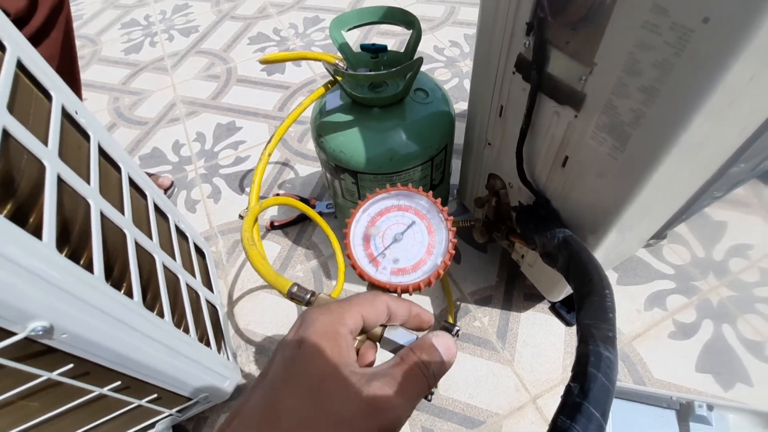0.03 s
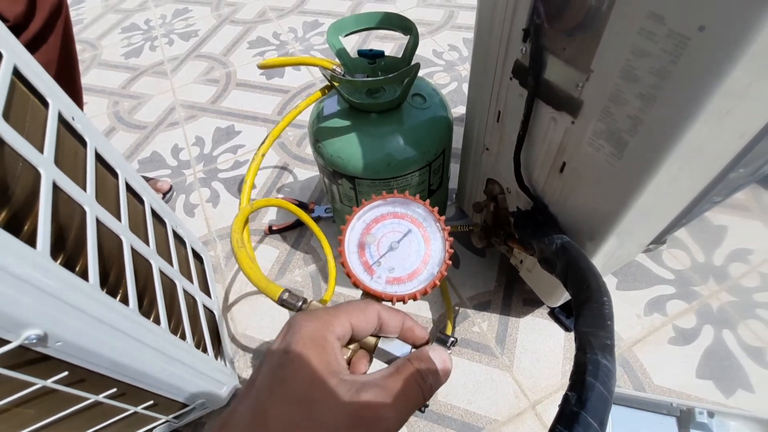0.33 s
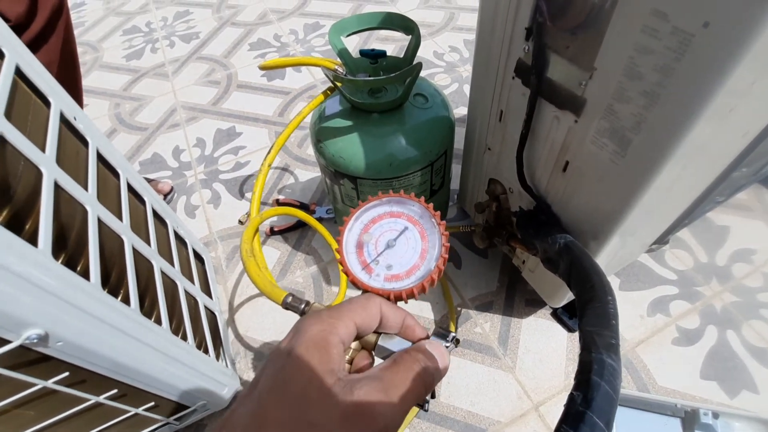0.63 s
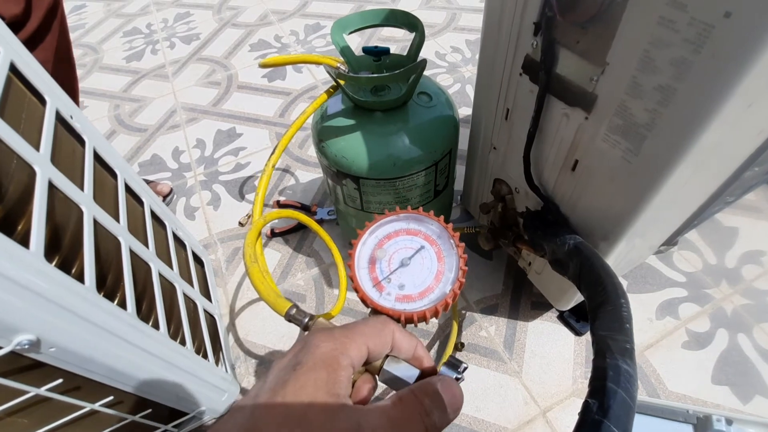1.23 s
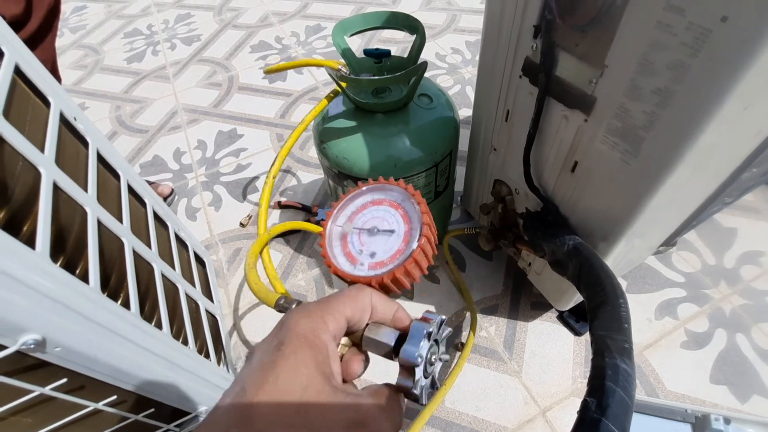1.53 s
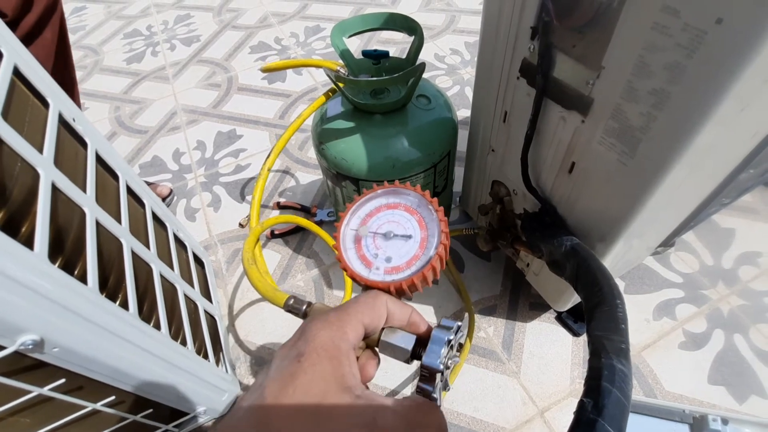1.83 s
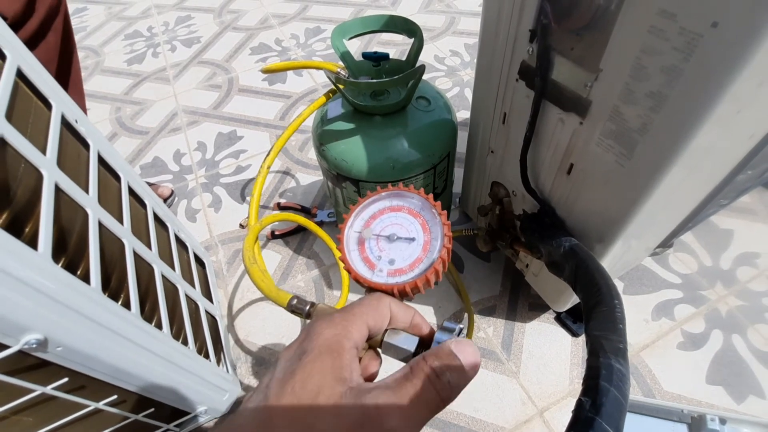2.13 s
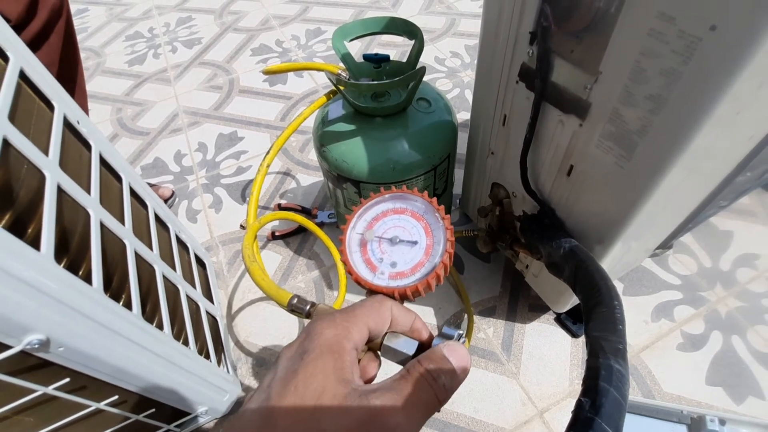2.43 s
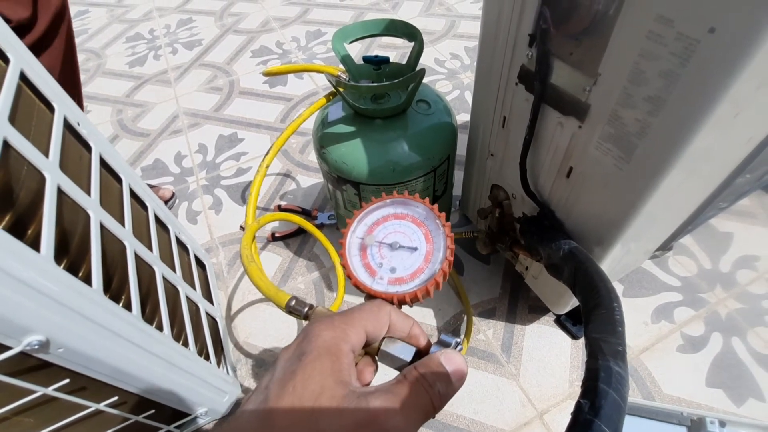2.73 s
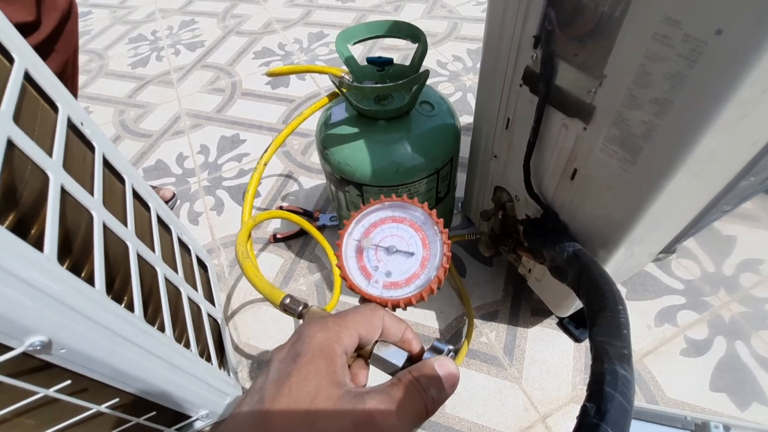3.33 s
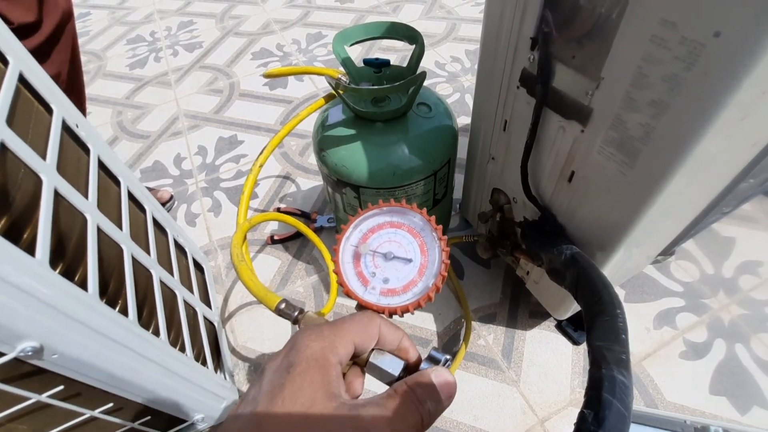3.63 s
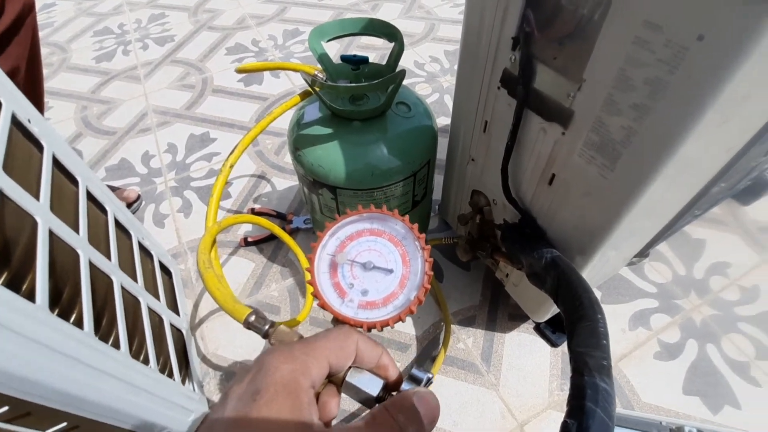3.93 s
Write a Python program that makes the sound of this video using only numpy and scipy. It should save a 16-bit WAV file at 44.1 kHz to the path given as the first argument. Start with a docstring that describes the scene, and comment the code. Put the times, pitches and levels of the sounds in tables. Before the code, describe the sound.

Gas escapes from a valve close by: a spit and thin whistle, then a loud hissing jet that rises in pitch and softens. Outdoors, an air conditioner fan drones and wind buffets the microphone throughout.

```python
"""Refrigerant gas escapes as a gauge valve is unscrewed from an outdoor air conditioner.
It spits, seeps with a thin whistle, then bursts out as a loud jet. The rushing gas makes the gap
ring, higher as the coupling turns, and the jet thins to a softer, higher hiss. All along, wind
buffets the left and right microphone openings (the ports) and the unit's fan drones.
A far bird chirps at the start."""
import sys
import numpy as np
from scipy import signal
from scipy.fft import rfft, irfft, next_fast_len
from scipy.io import wavfile
from scipy.ndimage import uniform_filter1d, map_coordinates

SR = 44100
rng = np.random.default_rng(int(sys.argv[2]) if len(sys.argv) > 2 else 0)


def wav_record(signal):
    """Record a signal, one row per channel, as 16-bit PCM in the file named by sys.argv[1]."""
    frames = np.transpose(np.atleast_2d(signal))
    bounded = np.clip(frames, -1, 1)
    # unit amplitude maps onto the largest positive 16-bit level
    quanta = np.round(bounded * 32767).astype(np.int16)
    wavfile.write(sys.argv[1], SR, quanta)


N = 176400

# how loud each steady or swelling sound is (time [s], level [dB])
FAN_LEVEL = [(0, -39.5), (1.7, -40), (1.95, -44.5), (2.6, -44.5), (3.55, -44.5), (3.69, -47.5),
             (3.8, -43.5), (4, -46)]
BREEZE_LEVEL = [(0, -43.5), (.45, -42.5), (.75, -34.5), (.92, -39), (1.05, -32.5), (1.2, -36.5),
                (1.35, -34.5), (1.5, -47), (1.75, -38.5), (1.97, -43.5), (2.03, -31.5), (2.15, -43.5),
                (2.35, -53.5), (2.63, -50), (2.78, -32), (2.96, -38.5), (3.15, -38), (3.35, -38.5),
                (3.55, -43), (3.68, -53), (3.85, -50), (4, -57)]
SEEP_LEVEL = [(1.39, -85), (1.42, -50), (1.47, -49.5), (1.6, -46), (1.75, -41), (1.78, -42), (1.8, -85)]
SPIT_LEVEL = [(1.395, -83), (1.408, -43.5), (1.44, -43), (1.47, -52), (1.5, -70)]
WHISTLE_LEVEL = [(1.44, -87), (1.475, -50), (1.54, -45), (1.58, -48.5), (1.68, -47), (1.75, -45),
                 (1.78, -85)]
JET_LEVEL = [(1.755, -85), (1.767, -39), (1.776, -21), (1.83, -23.5), (1.9, -26.5), (2.15, -26.8),
             (2.27, -25.5), (2.45, -27), (2.5, -29), (2.7, -30.5), (2.78, -35), (2.92, -35), (3.0, -44),
             (3.1, -85)]
HISS_LEVEL = [(2.55, -87), (2.7, -57), (2.8, -35.5), (2.92, -33.5), (3.05, -34.5), (3.3, -35), (3.45, -35),
              (3.63, -33.5), (3.68, -36.5), (3.75, -34), (4, -35)]
SWELL_LEVEL = [(3.68, -80), (3.76, -46), (4, -42)]
# each noise's colour, its mix of low and high sound (frequency [Hz], relative level [dB])
FAN_COLOUR = [(20, -26), (40, -9), (60, -3), (105, 1), (170, -7), (230, -10.5), (320, 1.5), (450, -1),
              (600, -8), (900, -9), (1300, -14), (1800, -22.5), (2500, -24), (3500, -28.5), (5000, -31.5),
              (8300, -32.5), (9500, -40), (11000, -33.5), (13000, -34), (15300, -31.5)]
BREEZE_COLOUR = [(20, -25), (40, -7.5), (75, 0.5), (130, 0.5), (220, -5.5), (320, 0.5), (420, -1.5),
                 (550, -14.5), (750, -22.5), (1100, -30), (2000, -44), (4000, -46), (9000, -75)]
GUST_COLOUR = [(20, -30), (40, -29), (75, -12), (130, -5), (220, -8.5), (320, 2.5), (420, -2), (550, -9.5),
               (750, -16.5), (1100, -25.5), (2000, -45.5), (4000, -85)]
PUFF_COLOUR = [(20, -30), (45, -8), (80, 1), (130, -4), (220, -16), (500, -40), (2000, -70)]
SEEP_COLOUR = [(1000, -12), (2400, -7.5), (3700, 0.5), (5000, -7.5), (5700, -7.5), (6900, -4.5),
               (8300, 1.5), (9400, -15), (11800, -5), (13000, -1), (15400, -13)]
SPIT_COLOUR = [(1500, -35), (2400, -2), (4500, -9), (5200, 0), (7000, -6), (8400, -4), (9500, -17),
               (15000, -27)]
JET_COLOUR = [(900, -55), (1650, -28), (1950, -19), (2600, -16), (3700, -19), (4400, -17), (4750, -21),
              (5200, -9.5), (6400, -11.5), (7000, -6.5), (7600, -5), (8000, -.5), (8250, 0), (8550, -10),
              (9100, -10), (9500, -15), (12300, -13), (14200, -10), (15400, -13)]
HISS_COLOUR = [(1000, -12.5), (2000, -15), (2700, -15), (3300, -11), (4500, -5), (5100, -6.5), (5600, -2),
               (6600, 0), (7400, 0.5), (7800, -1), (8400, 6.5), (8900, -2), (9500, -6.5), (10000, -4.5),
               (11500, -4.5), (13000, -3.5), (14500, -0.5), (15400, -3)]
# how each sound reaches the two ports
# (frequency [Hz], likeness of the sides [0-1], left's phase lead [rad], left minus right [dB])
FAN_PORTS = [(60, 0.75, 0.48, 2.5), (444, 0.91, -0.71, -0.2), (1050, 0.07, -1.13, 0.2),
             (2000, 0.028, -1.1, -0.2), (12000, 0.056, 0.55, -5.5)]
WIND_PORTS = [(40, .05, 0.0097, -1.5), (150, 0.47, 0, 5), (350, 0.25, 0, 0), (1000, 0.033, 0, -3.5)]
JET_PORTS = [(1510, 0.2, 0.64, 2), (1830, 0.7, 0.78, 2), (2420, 1, 2.86, -1.5), (3040, 0.35, 2.3, 1.5),
             (3580, 0.96, 2.9, 4), (3580, 0, 1.7, -12), (4030, 1, 3.4, -3.5), (5010, 1, 6.5, 1.5),
             (4880, 0.5, 3.1, -1.5), (5580, 1, 3.74, -6), (6120, 0.9, 5.9, -9), (6700, 1, 6.3, -2),
             (7350, 0.97, 8.8, -5.5), (7920, 0.72, 8.6, -0.5), (8600, 0.98, 10.4, -3), (9440, 1, 9.2, -1),
             (9500, 0.4, 8.7, -11), (10700, 0.1, 9.9, 7), (12000, 0.05, 9.3, 1), (12900, .55, 13.9, -3),
             (15500, 0.2, 13.4, 2)]
HISS_PORTS = [(1500, 1, 1.6, 2), (2560, 0.91, 2.3, -2), (3690, 0.87, 3, 0.5), (3560, 0.29, 7, 8),
              (4500, 1, 3.86, -3), (5540, 0.59, 5.56, -0.5), (6440, 0.52, 6, -7), (7340, 0.5, 8.4, -1.5),
              (8420, 0.29, 9.3, -3.5), (8700, 0.31, 11, 2), (10400, 0.82, 12.2, 2), (11650, .5, 15, 1.5),
              (13400, 0.42, 12.7, -1), (14400, 0.46, 13.7, -2), (15400, 0.51, 14.5, 2)]
# the fan's humming tones (pitch [Hz], level against the rushing air [dB])
HUM_TONES = [(104, -23), (315, -15.5), (473, -6.5), (886, -20), (2120, -30.5)]
# the bird's calls (time [s], length [s], start pitch [Hz], end pitch [Hz], level [dB])
CHIRPS = [(0.016, .018, 4200, 4600, -56), (0.037, .02, 4300, 3350, -58), (0.086, 0.041, 3360, 4470, -53.5),
          (0.116, 0.016, 4280, 3040, -54.5), (.157, .026, 5030, 4100, -56)]
# short gusts of wind (time [s], peak level [dB], half length [s])
GUSTS = [(0.522, -38, 0.022), (1.002, -33.5, 0.013), (1.066, -26.5, 0.0073), (1.135, -30, 0.02),
         (1.258, -26.5, 0.01), (1.296, -24.5, 0.0095), (1.32, -29, 0.0081), (1.796, -30, 0.01),
         (2.007, -35, 0.0045), (2.778, -25, 0.021), (2.885, -22, 0.0056), (2.913, -27.5, 0.027),
         (3.046, -25, .008), (3.269, -26, 0.015), (3.303, -27, 0.012), (3.347, -24, 0.016)]
# deep puffs of air right into the ports (time [s], level [dB])
PUFFS = [(.5, -35), (1.69, -40), (1.772, -31), (2.006, -34), (2.785, -30), (2.905, -29), (3.34, -33)]
# single swirls of air that slap the ports (time [s], level [dB])
SLAPS = [(.702, -21), (.783, -22), (0.979, -22), (1.036, -20), (1.230, -17), (1.254, -16.5), (1.289, -18),
         (1.783, -23), (2.805, -20.5), (2.865, -19), (2.870, -11), (2.882, -11.5), (3.015, -16.5),
         (3.040, -19.5), (3.07, -20.5), (3.263, -19), (3.337, -16.5), (3.35, -16)]
# the hollow tones of a slapped port (pitch [Hz], relative level [dB], time to fade by 60 dB [s])
PORT_TONES = [(120, -7, 0.036), (329, 1.5, 0.04), (436, 0, 0.021), (686, -13.5, 0.021)]
# the ring of the gap in the coupling and the sizzle at its lip (time [s], pitch [Hz], level [dB])
GAP_RING = [(1.765, 2300, -85), (1.778, 2300, -38), (1.9, 2560, -41), (2.45, 2650, -40), (2.7, 2720, -38.5),
            (2.8, 3050, -38), (2.88, 3500, -36.5), (2.96, 4060, -38.5), (3.05, 4350, -45), (3.3, 4450, -48),
            (3.68, 4350, -47), (4, 4150, -41.5)]
SIZZLE = [(1.9, 13700, -80), (2.23, 13900, -45), (2.42, 14300, -46), (2.55, 13900, -46), (3.2, 14400, -54),
          (3.45, 14550, -44), (3.66, 14550, -44), (3.75, 15280, -47), (4, 15200, -60)]
# the bands in which the gap rings (multiple of the pitch [ratio], width [Hz], relative level [dB])
GAP_BANDS = [(1, 900, -1.5), (2.13, 1050, 1.5)]
# narrow bands in which the brass fittings ring (frequency [Hz], width [Hz], boost [dB])
FITTINGS = [(2070, 90, 4), (2400, 130, 3.5), (2730, 150, 4), (3030, 140, 5), (3330, 90, 3.5),
            (3720, 140, 2.5), (5400, 250, 3), (5860, 110, 3), (7370, 130, 5), (7930, 110, 4),
            (9500, 200, 3), (11450, 130, 4), (12970, 220, 4.5), (15260, 280, 4.5)]

# A RATE counts random values per second.
HUM_DRIFT, HUM_WAVER_DB = 0.0069, 1.5  # wander in pitch (as a share of it) and in level
BREEZE_SWIRL_DB, GUST_SWIRL_DB, SWIRL_RATE = 5, 1, 75  # lumps in the wind
PUFF_ATTACK_S, PUFF_DECAY_S = 0.0013, 0.031
SLAP_ATTACK_S, SLAP_SCATTER = 0.0011, 0.057  # rise time; share by which the pitch varies
WHISTLE_HZ, WHISTLE_WIDTH_HZ = 7430, 64
SPUTTER_DB, SPUTTER_RATE, SURGE_DB, SURGE_RATE = 0.5, 92, 0.84, 84  # unsteady gas flow
PATCH_DB, PATCH_WIDTH_HZ, PATCH_S = 1.9, 260, .16  # shifting patches in the jet and hiss
SIZZLE_WIDTH_HZ = 600
SWELL_HZ, SWELL_WIDTH_HZ = 8900, 960
ECHO_DB, ECHO_FIRST_S, ECHO_FADE_S = -6, 0.00073, 0.05  # the fade is the time to drop 60 dB
TOP_HZ = 15530


def amp(db):
    """Turn decibels into a gain, a number to multiply by."""
    return 10 ** (np.asarray(db) / 20)


def unit(x):
    """Scale a signal to an average strength (rms) of 1."""
    return x / np.sqrt(np.mean(x ** 2) + 1e-20)


def at_frequencies(rows, hz):
    """Read each column of a frequency table at hz, on a log scale."""
    row_hz, *columns = np.transpose(rows)
    return [np.interp(np.log(hz + 1), np.log(row_hz + 1), column) for column in columns]


def at_times(rows, t):
    """Read each column of a time table at the times t."""
    row_s, *columns = np.transpose(rows)
    return [np.interp(t, row_s, column) for column in columns]


def level(rows):
    """A gain for every sample, from (time [s], level [dB]) rows."""
    return amp(at_times(rows, np.arange(N) / SR)[0])


def wobble(rate):
    """A smooth curve through `rate` random values a second."""
    points = rng.standard_normal(int(N * rate / SR) + 4)
    return map_coordinates(points, [np.arange(N) * rate / SR])


def filtered(x, response):
    """Multiply each frequency in x by response(hz)."""
    size = next_fast_len(N + SR // 4)
    hz = np.fft.rfftfreq(size, 1 / SR)
    return irfft(rfft(x, size) * response(hz), size)[..., :N]


def noise(colour):
    """Two unrelated noises of one colour."""
    return filtered(rng.standard_normal((2, N)), lambda hz: amp(at_frequencies(colour, hz)[0]))


def bump(hz, centre_hz, width_hz):
    """A gain of 1 at the centre that falls away on both sides."""
    return 1 / (1 + ((hz - centre_hz) / (width_hz / 2)) ** 2)


def band_noise(centre_hz, width_hz):
    """Two unrelated noises gathered around one pitch."""
    return filtered(rng.standard_normal((2, N)), lambda hz: bump(hz, centre_hz, width_hz))


def at_ports(pair, ports):
    """Blend two unrelated signals into left and right, with an overall strength of 1."""
    def response(hz):
        likeness, lead, balance_db = at_frequencies(ports, hz)
        angle = np.arccos(np.clip(likeness, 0, 1)) / 2
        shared, opposed = np.cos(angle), np.sin(angle)
        tilt = amp(balance_db / 2) * np.exp(.5j * lead)
        paths = np.array([[shared * tilt, opposed * tilt], [shared / tilt, -opposed / tilt]])
        return paths / np.sqrt(amp(balance_db) + amp(-balance_db))
    return unit(filtered(pair, response).sum(axis=1))


def fan():
    """The fan pushes out rushing air and hums with a few unsteady tones."""
    hum = np.zeros(N)
    for hz, db in HUM_TONES:
        gain = amp(db + HUM_WAVER_DB * wobble(rate=8.18))
        pitch_hz = hz * (1 + HUM_DRIFT * wobble(rate=25.02))
        hum += gain * np.sqrt(2) * np.sin(2 * np.pi * np.cumsum(pitch_hz) / SR)
    rush = at_ports(noise(FAN_COLOUR), FAN_PORTS)
    return level(FAN_LEVEL) * (rush + hum)


def buffet(colour, swirl_db):
    """Wind noise made lumpy by each port's own swirls of air."""
    swirls = unit(amp(swirl_db * np.array([wobble(SWIRL_RATE), wobble(SWIRL_RATE)])))
    return swirls * at_ports(noise(colour), WIND_PORTS)


def wind():
    """A low breeze blows over the ports, with short, hollow gusts on top."""
    t = np.arange(N) / SR
    breeze = level(BREEZE_LEVEL) * buffet(BREEZE_COLOUR, BREEZE_SWIRL_DB)
    gust_power = sum(amp(db) ** 2 * np.exp(-((t - peak_s) / half_s) ** 2) for peak_s, db, half_s in GUSTS)
    return breeze + np.sqrt(gust_power) * buffet(GUST_COLOUR, GUST_SWIRL_DB)


def bird():
    """A far bird sings faint tones that slide quickly up or down."""
    t, song = np.arange(N) / SR, np.zeros(N)
    for start_s, length_s, start_hz, end_hz, db in CHIRPS:
        progress = np.clip((t - start_s) / length_s, 0, 1)
        pitch_hz = start_hz + (end_hz - start_hz) * progress
        song += amp(db) * np.sin(np.pi * progress) * np.sin(2 * np.pi * np.cumsum(pitch_hz) / SR)
    return song


def puffs():
    """Air blows right into the ports; each deep puff rises quickly and dies away."""
    t, push = np.arange(N) / SR, np.zeros(N)
    for start_s, db in PUFFS:
        age = np.maximum(t - start_s, 0)
        push += amp(db) * (1 - np.exp(-age / PUFF_ATTACK_S)) * np.exp(-age / PUFF_DECAY_S)
    return push * at_ports(noise(PUFF_COLOUR), WIND_PORTS)


def slaps():
    """A swirl of air slaps both ports, and each rings briefly at slightly different pitches."""
    out, t = np.zeros((2, N)), np.arange(SR // 12) / SR
    hz, tone_db, fade_s = np.transpose(PORT_TONES)[..., None]
    rise = (1 - np.exp(-t / SLAP_ATTACK_S)) ** 2
    for start_s, db in SLAPS:
        pitch_hz = hz * (1 + SLAP_SCATTER * rng.standard_normal((2, len(hz), 1)))
        phase = rng.uniform(0, 2 * np.pi, (2, 1, 1))
        tones = amp(tone_db - 60 * t / fade_s) * np.sin(2 * np.pi * pitch_hz * t + phase)
        start = round(start_s * SR)
        out[:, start:start + len(t)] += amp(db) * rise * tones.sum(axis=1)
    return out


def leak():
    """The seal breaks with a spit, then gas seeps and whistles through the screw thread."""
    whistle = level(WHISTLE_LEVEL) * at_ports(band_noise(WHISTLE_HZ, WHISTLE_WIDTH_HZ), JET_PORTS)
    spit = level(SPIT_LEVEL) * at_ports(noise(SPIT_COLOUR), JET_PORTS)
    seep = level(SEEP_LEVEL) * at_ports(noise(SEEP_COLOUR), HISS_PORTS)
    return spit + seep + whistle


def shifting(pair):
    """Make narrow bands of a noise swell and fade at random."""
    hz, t, spectrum = signal.stft(pair, SR, nperseg=1024)
    patches = rng.standard_normal(spectrum.shape)
    for _ in range(2):  # blur across frequency and time
        patches = uniform_filter1d(patches, round(PATCH_WIDTH_HZ / hz[1]), axis=1)
        patches = uniform_filter1d(patches, round(PATCH_S / t[1]), axis=2)
    return signal.istft(spectrum * amp(PATCH_DB * unit(patches)), SR, nperseg=1024)[1][:, :N]


def jet():
    """The gas bursts out at full force."""
    return level(JET_LEVEL) * at_ports(shifting(noise(JET_COLOUR)), JET_PORTS)


def gliding(rows, bands, ports):
    """Bands of noise that follow (time [s], pitch [Hz], level [dB]) rows."""
    hz, t, spectrum = signal.stft(rng.standard_normal((2, N)), SR, nperseg=512)
    pitch_hz = at_times(rows, t)[0]
    gain = sum(amp(db) * bump(hz[:, None], ratio * pitch_hz, width) for ratio, width, db in bands)
    ring = signal.istft(spectrum * gain, SR, nperseg=512)[1][:, :N]
    level_db = at_times(rows, np.arange(N) / SR)[1]
    return amp(level_db) * at_ports(ring, ports)


def gap_ring():
    """Churning gas rings the gap and sizzles at its lip; both climb as the coupling turns."""
    ring = gliding(GAP_RING, GAP_BANDS, JET_PORTS)
    sizzle = gliding(SIZZLE, [(1, SIZZLE_WIDTH_HZ, 0)], HISS_PORTS)
    return ring + sizzle


def thin_hiss():
    """The jet thins to a softer hiss, and one high band swells near the end."""
    hiss = level(HISS_LEVEL) * at_ports(shifting(noise(HISS_COLOUR)), HISS_PORTS)
    swell = level(SWELL_LEVEL) * unit(band_noise(SWELL_HZ, SWELL_WIDTH_HZ))
    return hiss + swell


def gas():
    """All the escaping gas together; the whole flow sputters slightly."""
    flow = jet() + thin_hiss()
    flutter = amp(SPUTTER_DB * wobble(SPUTTER_RATE) + SURGE_DB * wobble(SURGE_RATE))
    return flutter * (leak() + flow + gap_ring())


def fittings(x):
    """The brass fittings ring along with the gas and boost narrow bands of its sound."""
    return filtered(x, lambda hz: amp(sum(db * bump(hz, centre, width) for centre, width, db in FITTINGS)))


def echoes(x):
    """Sound bounces between cabinet, wall and tiles, adding quick echoes at each port."""
    t = np.arange(SR // 30) / SR
    bounces = rng.standard_normal((2, len(t))) * amp(-60 * t / ECHO_FADE_S) * (t > ECHO_FIRST_S)
    bounces /= np.linalg.norm(bounces, axis=1, keepdims=True)
    return x + amp(ECHO_DB) * signal.fftconvolve(x, bounces, axes=1)[:, :N]


def scene():
    """Gas close by, wind on the ports, fan and bird behind."""
    return echoes(fittings(gas())) + wind() + slaps() + puffs() + fan() + bird()


def record(dry):
    """Cut away all sound above TOP_HZ."""
    return filtered(dry, lambda hz: hz < TOP_HZ)


dry = scene()
out = record(dry)
wav_record(out)
```